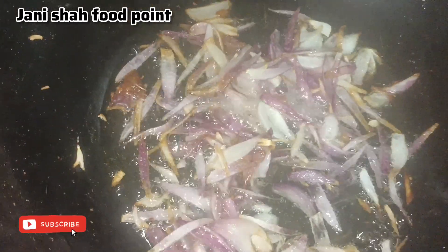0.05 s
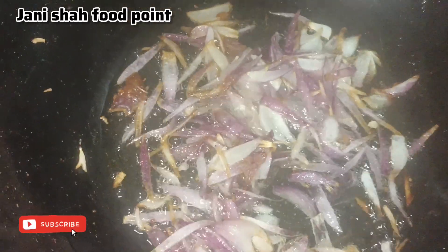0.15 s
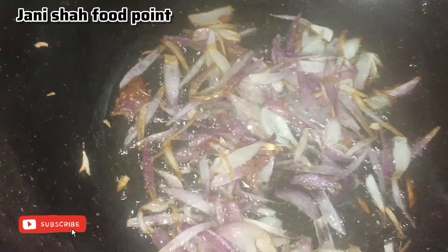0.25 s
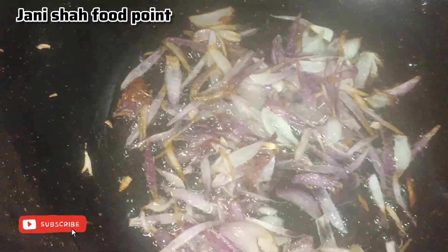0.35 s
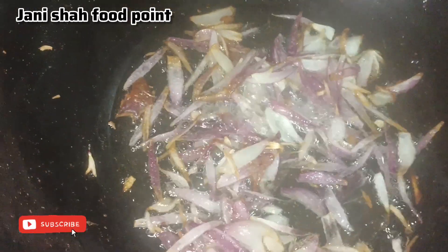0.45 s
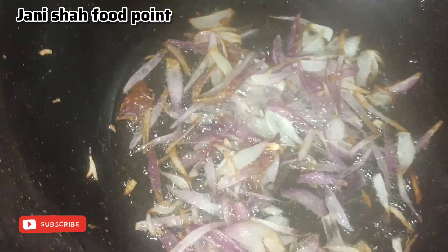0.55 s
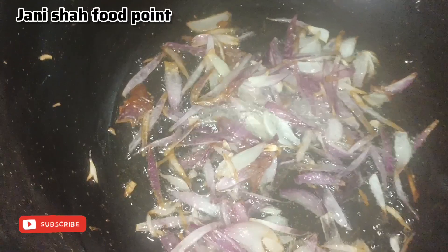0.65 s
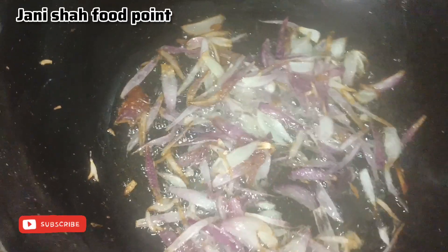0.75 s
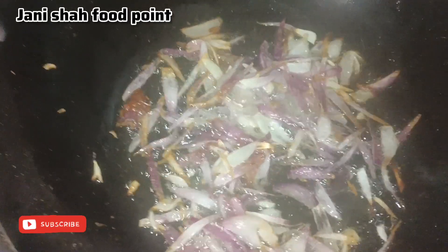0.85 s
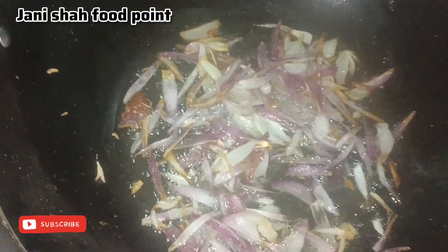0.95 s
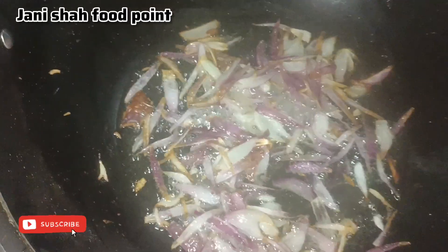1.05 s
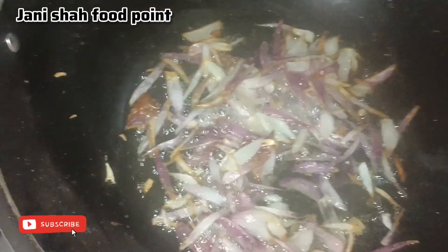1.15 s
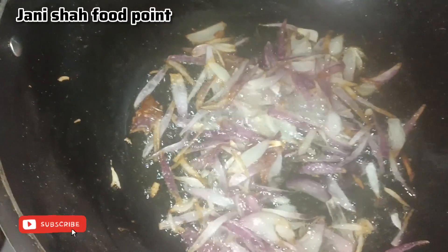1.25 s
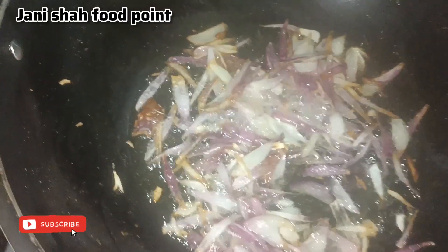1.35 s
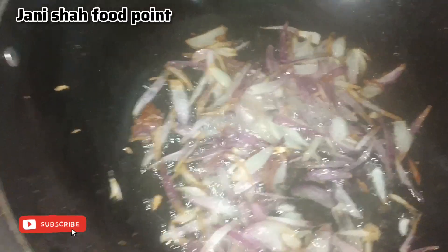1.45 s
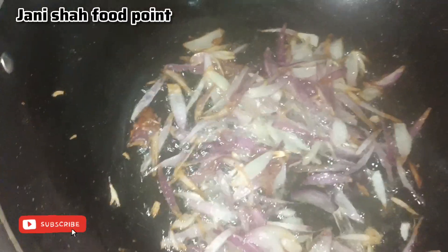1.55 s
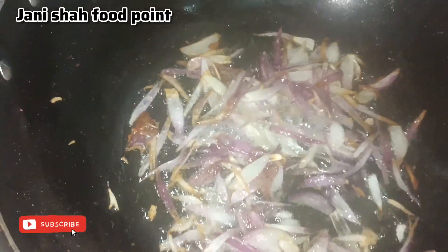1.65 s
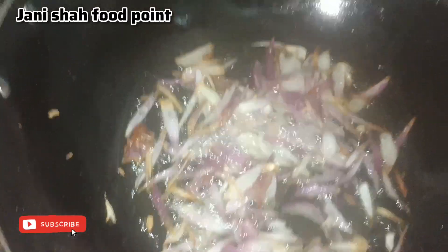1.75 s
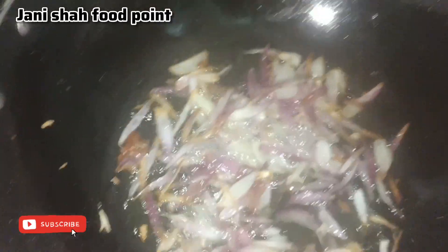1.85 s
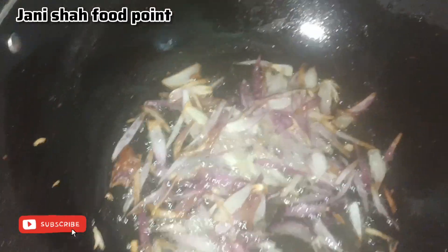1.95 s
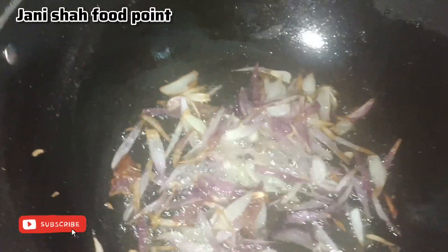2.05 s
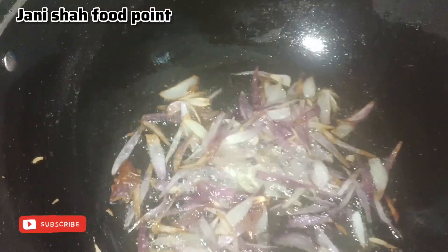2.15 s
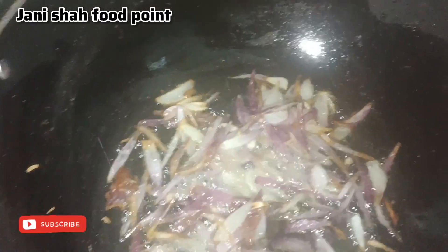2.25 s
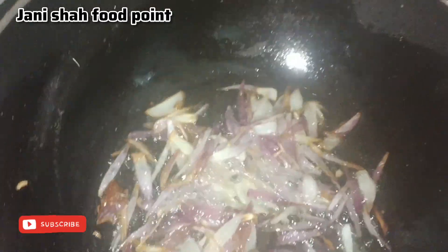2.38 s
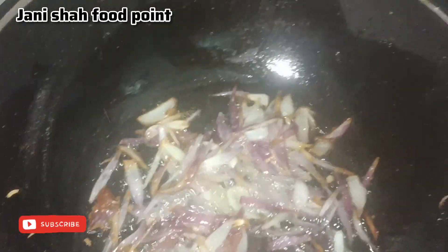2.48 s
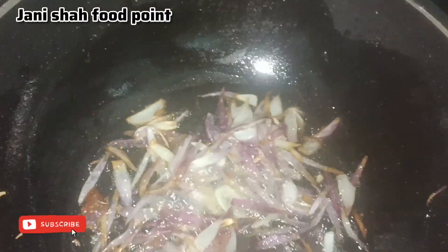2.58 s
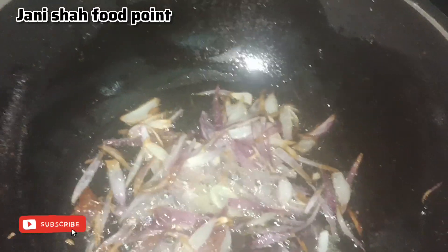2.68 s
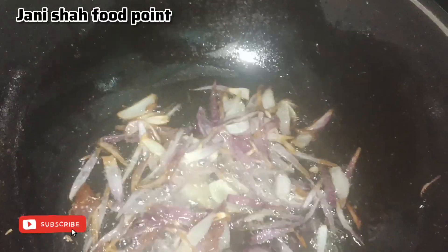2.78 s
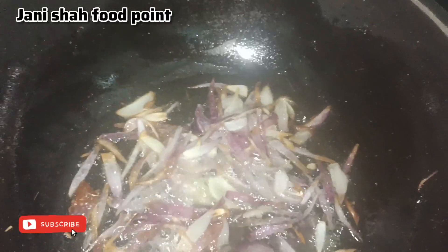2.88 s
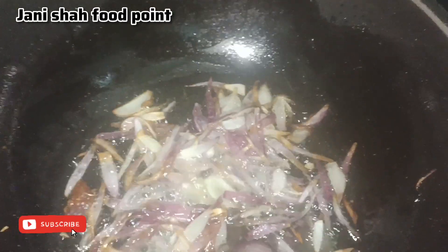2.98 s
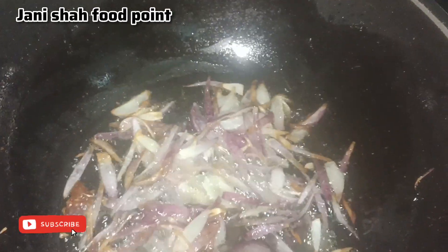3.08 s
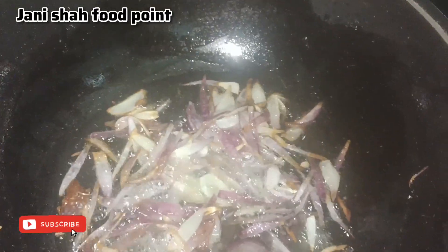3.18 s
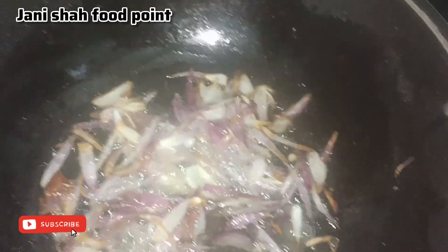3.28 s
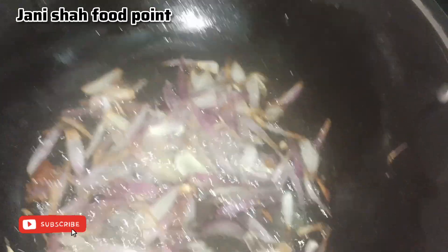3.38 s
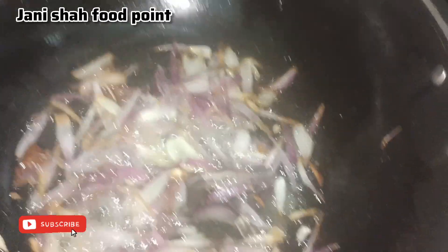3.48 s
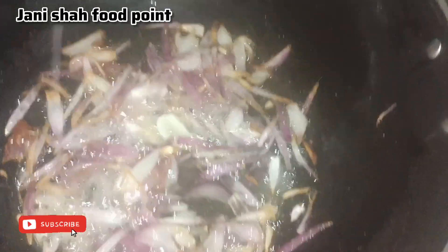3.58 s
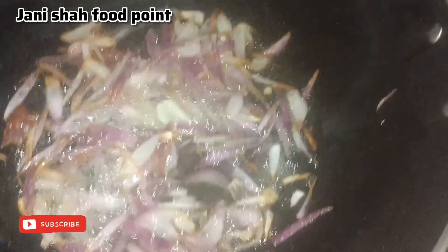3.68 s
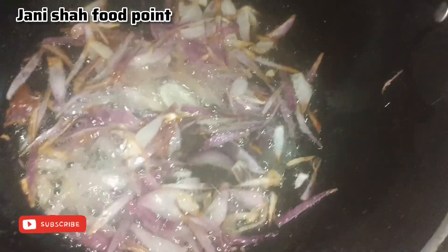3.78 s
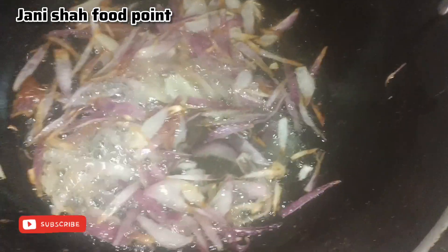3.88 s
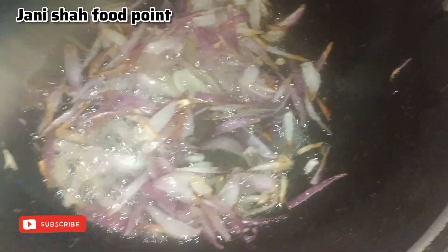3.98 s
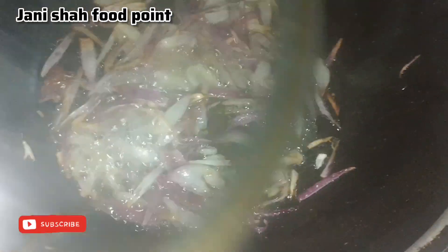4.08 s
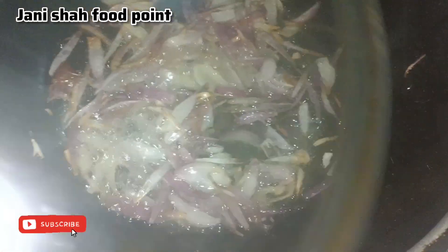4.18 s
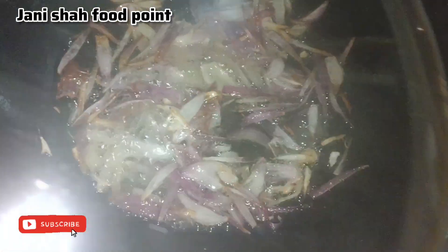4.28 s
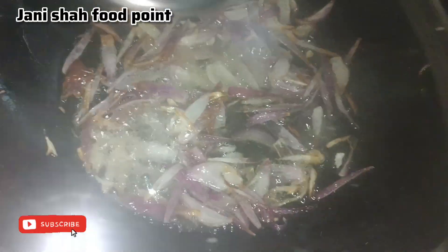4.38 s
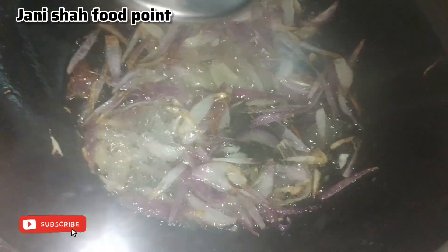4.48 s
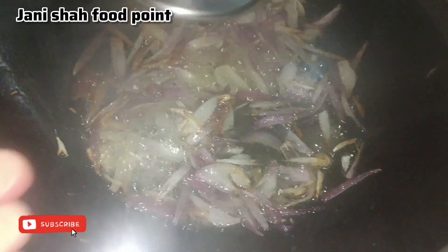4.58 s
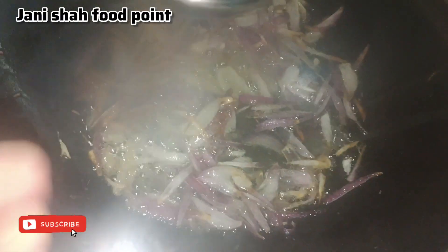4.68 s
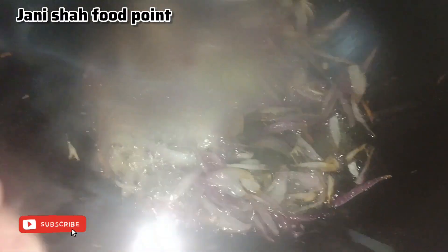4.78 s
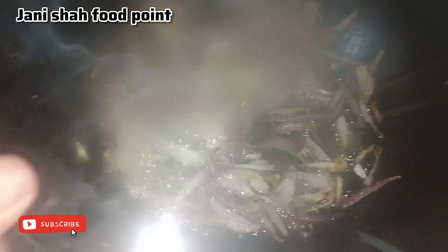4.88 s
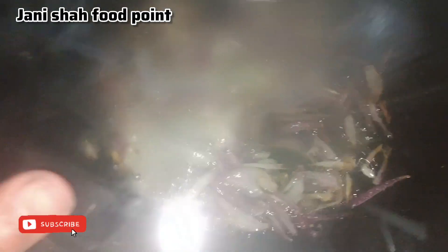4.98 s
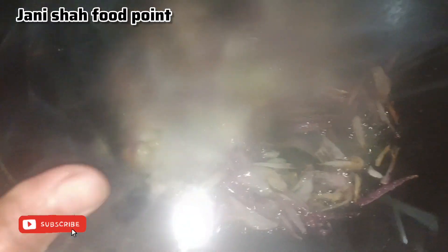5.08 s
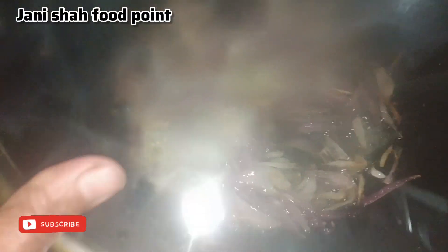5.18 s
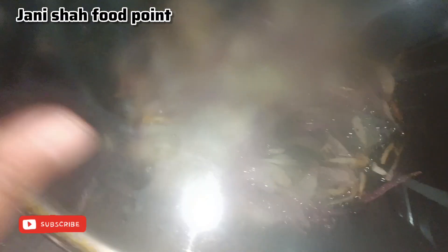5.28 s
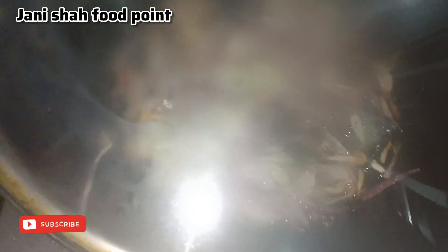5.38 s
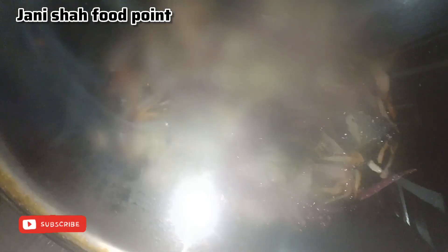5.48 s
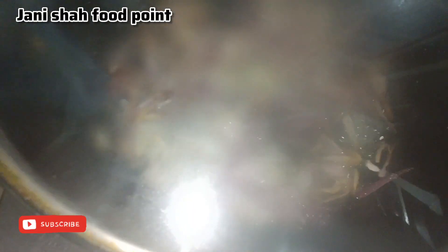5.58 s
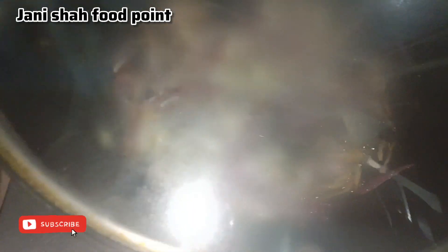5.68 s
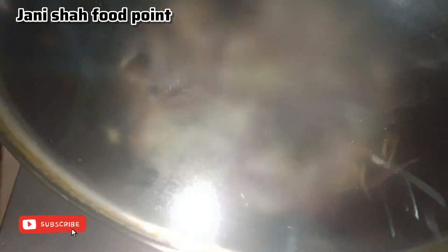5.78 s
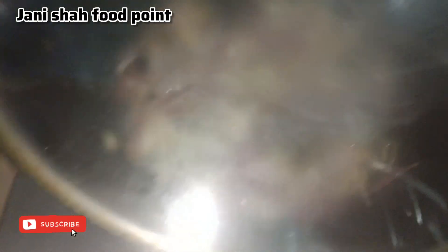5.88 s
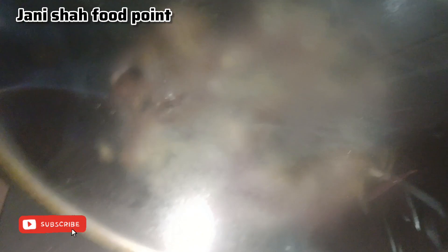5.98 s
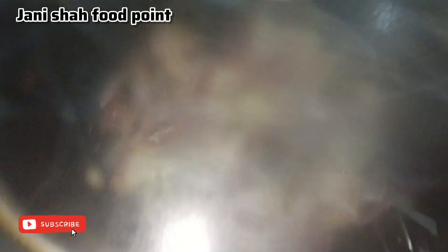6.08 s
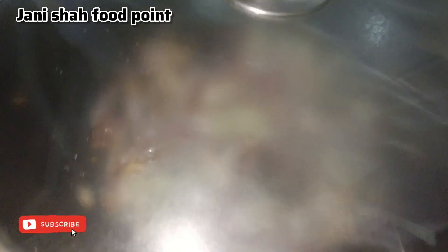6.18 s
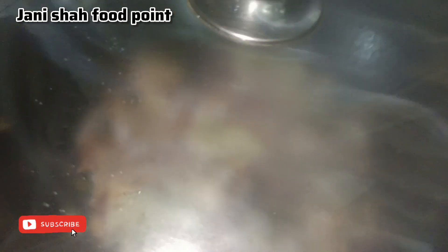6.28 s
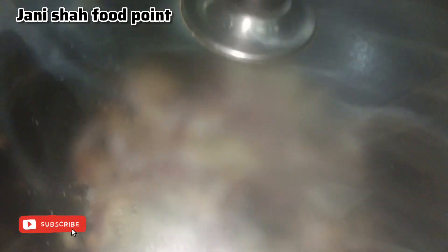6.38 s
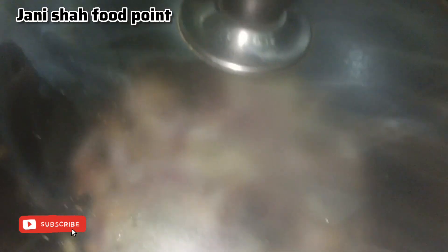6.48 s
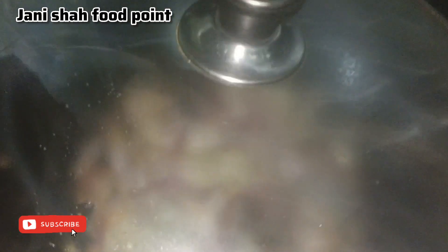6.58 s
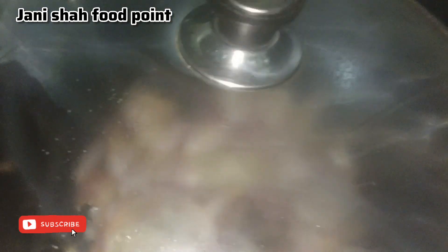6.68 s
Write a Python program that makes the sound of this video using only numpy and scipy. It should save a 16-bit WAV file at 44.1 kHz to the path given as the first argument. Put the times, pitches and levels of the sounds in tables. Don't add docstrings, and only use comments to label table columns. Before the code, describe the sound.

Close handheld capture of a wok: a soft distant sizzle, then a bright rush as the microphone leans in, with dense bubbling, round plops and sharp fat snaps in irregular flurries. A couple of light low knocks come midway. The glass lid then clanks, drags and lands in several hard hits, cutting the low wash and spatter. Muffled simmering with small whistly surges remains. The sound sits on the left, with faint handling thumps on the right.

```python
import sys
import numpy as np
from scipy import signal
from scipy.io import wavfile
from scipy.ndimage import uniform_filter1d

SR = 44100
rng = np.random.default_rng(int(sys.argv[2]) if len(sys.argv) > 2 else 0)


def wav_out(sig):
    wavfile.write(sys.argv[1], SR, np.round(np.clip(np.atleast_2d(sig).T, -1, 1) * 32767).astype(np.int16))


def field_ratio(decibels):
    return 10 ** (np.asarray(decibels, dtype=float) / 20)


N = 297234
T = np.arange(N) / SR
HZ = abs(np.fft.fftfreq(8192, 1 / SR))

# freq_hz, density_db (per Hz)
FAR_COLOUR = [(180, -67.5), (300, -16.5), (742, -7.5), (1060, -0.5), (1360, 0.5), (1660, 1.5), (2360, -4),
              (3770, -4.5), (5020, -9.5), (9980, -10), (11000, -10.5), (11700, -27), (15200, -14.5),
              (16500, -45)]
# freq_hz, density_db (per Hz)
OPEN_COLOUR = [(180, -19), (300, -23), (531, -16.5), (742, -20), (1060, -4), (1310, 9.5), (1450, 10),
               (1800, 5.5), (2610, 6), (3650, 4.5), (5930, -19), (8900, -13), (9900, -9.5), (11000, -13),
               (11700, -21.5), (14900, -18.5), (16500, -37.5)]
# start_s, peak_db, pitch_hz
FAR_POPS = [(0.0832, -27, 1780), (0.1135, -27, 1070), (0.1535, -23, 1590), (0.2025, -20, 1080),
            (.44, -18, 3900), (.6619, -20, 3760), (.818, -25, 3500), (1.058, -28, 1640),
            (0.3728, -20, 2500), (0.5647, -16, 1080), (0.7618, -20, 1080), (0.8497, -18, 2030),
            (0.8998, -19.5, 2440), (0.9772, -21, 1520), (1.1069, -14, 2420), (1.2077, -20, 2000),
            (1.277, -16, 1710), (1.4426, -23, 2770)]
# start_s, peak_db, pitch_hz
LARGE_POPS = [(0.341, -15, 1600), (0.557, -16, 1100), (1.1357, -7, 2340), (1.125, -20.5, 1016),
              (1.3204, -21, 2560), (1.841, -11.5, 2630), (2.2172, -15, 2580), (2.4886, -15, 2620),
              (2.002, -15, 1100), (2.349, -17, 1250), (2.78, -24, 1220), (2.892, -19, 1320),
              (1.3371, -11.5, 2100), (1.3792, -19, 1390), (1.492, -4.5, 2630), (1.608, -9, 2050),
              (1.694, -8.5, 2600), (1.8628, -7, 1640), (2.0685, -9, 3180), (2.231, -9, 1320),
              (2.5007, -8, 1490), (2.6243, -10, 1970), (2.8438, -14, 1720), (3.0055, -14, 2630),
              (3.145, -12, 1510), (3.2256, -6.5, 2460), (3.3309, -2.5, 2250), (3.419, -15, 2630),
              (3.513, -10.5, 1440), (3.554, -7.5, 1530), (3.6048, -7.5, 2860), (3.666, -8, 2590),
              (3.7837, -5, 1565), (3.8959, -8, 2930), (4.0853, -10, 3400), (4.1628, -8, 2030),
              (4.1935, -3.5, 1470), (4.321, -7, 2490), (4.612, -19, 1470)]
# start_s, peak_db, pitch_hz
MIDDLING_POPS = [(1.1568, -30, 1270), (1.195, -35, 1360), (1.232, -22, 2100), (1.4133, -22.5, 1070),
                 (1.468, -13.5, 2640), (1.5318, -24, 2900), (1.5568, -18, 1400), (1.63, -11.5, 2260),
                 (1.6572, -12, 2670), (1.7265, -21, 2050), (1.7644, -21, 2100), (1.9638, -13.5, 2640),
                 (2.0246, -24, 2000), (2.095, -20, 2440), (2.1891, -16, 1420), (2.2092, -16, 1610),
                 (2.2513, -13.5, 1300), (2.3191, -31, 3190), (2.333, -20, 2750), (2.4071, -20, 1150),
                 (2.4433, -11, 2500), (2.5998, -16, 2500), (2.6514, -20, 2210), (2.7352, -12.5, 1640),
                 (2.7648, -18, 1580), (2.8085, -15, 1660), (2.8753, -17, 2500), (2.9138, -12.5, 1520),
                 (2.9638, -15, 2090), (2.9876, -26, 2280), (3.0316, -13, 3720), (3.055, -17, 2840),
                 (3.1228, -16, 2410), (3.1841, -29, 2503), (3.2413, -17, 2260), (3.265, -19, 2750),
                 (3.2841, -21, 2690), (3.3064, -20, 2030), (3.3168, -14, 2520), (3.3577, -14, 3570),
                 (3.3937, -23, 2210), (3.4296, -12, 2680), (3.459, -14, 2980), (3.4805, -19, 2470),
                 (3.5281, -9.5, 2170), (3.5716, -8.5, 2560), (3.6195, -22, 1540), (3.645, -16.5, 1560),
                 (3.6958, -17, 2440), (3.7077, -13, 1980), (3.7236, -8.5, 2630), (3.8043, -10, 2500),
                 (3.8187, -12.5, 1560), (3.8538, -13, 3320), (3.928, -13.5, 1970), (3.9798, -23, 1533)]
# start_s, peak_db, pitch_hz
LATE_POPS = [(3.96, -14, 1460), (4.0035, -8.5, 1470), (4.1285, -11, 2500), (4.252, -9.5, 2500),
             (4.299, -19, 2480), (4.348, -10, 2310), (4.3885, -20, 2500), (4.4192, -16, 1480),
             (4.4658, -12.5, 2430), (4.5393, -11.5, 1980), (4.5807, -9, 2400), (4.6088, -7.5, 2520),
             (4.6383, -10, 1950), (4.679, -15, 1660), (4.701, -9.5, 1510), (4.764, -18.5, 1400),
             (4.791, -17, 1830), (4.8587, -17, 1370), (5.0545, -9.5, 1397), (5.0825, -13.5, 1090),
             (5.182, -13, 2050)]
# start_s, peak_db, pitch_hz, t60_s
SURGES = [(4.613, -20.5, 1435, 0.0795), (4.858, -24.5, 1410, 0.049), (4.92, -45, 1377, 0.12),
          (4.952, -24.5, 3560, 0.075), (5.038, -20, 1935, .06), (5.05, -19, 1412, 0.07),
          (5.614, -37.5, 1394, 0.14), (6.1, -42, 1381, 0.18), (6.164, -32.5, 1370, 0.12),
          (5.333, -21, 2770, 0.025), (5.4228, -30, 2100, 0.049), (5.456, -27, 2100, 0.049),
          (5.5794, -28, 3284, 0.12), (5.6162, -37, 2410, 0.032), (5.68, -26.5, 2070, 0.048),
          (5.7994, -24.5, 2010, 0.031), (5.8174, -30, 2180, 0.088), (5.8628, -28.5, 2410, 0.035),
          (6.022, -34, 2410, 0.047), (6.1, -43, 2150, 0.06), (6.1697, -39, 1940, 0.11),
          (6.2, -26, 2730, 0.042), (6.213, -26, 2357, 0.089), (6.305, -30.5, 2086, 0.15),
          (6.354, -23, 2050, 0.032), (6.4207, -20.5, 2075, 0.064), (6.6243, -32, 2460, 0.095),
          (6.669, -29, 2470, 0.04), (5.491, -38, 2040, .04), (5.653, -37, 2370, .03),
          (5.768, -38, 2400, .04), (5.81, -27.5, 2260, .04), (5.967, -35, 2080, .04),
          (5.982, -33, 3300, .03), (6.118, -35.5, 2010, 0.035), (6.208, -34, 2040, 0.036),
          (6.515, -32, 2070, 0.036), (6.552, -36, 2830, .05), (5.3, -37.5, 1380, 0.11),
          (5.378, -39, 1377, 0.12), (5.708, -45, 1373, 0.085), (6.345, -37, 1380, 0.1),
          (6.42, -36, 1383, 0.088), (6.618, -36.5, 1372, 0.11)]
# start_s, peak_db, top_octave_db (re peak)
SHARP_SPITS = [(0.304, -19, -24), (0.3928, -19, -14), (1.088, -20, -20), (1.1074, -20, -24),
               (1.2373, -16, -24), (1.323, -16, -20), (1.379, -14, -15), (1.412, -23, -36),
               (1.514, -21, -25), (1.628, -14.5, -31), (1.75, -15, -18), (1.825, -9.5, -37),
               (2.146, -20, -15), (2.1635, -13.5, -10), (2.379, -18, 2), (2.3983, -24, -14),
               (2.4264, -16, -15), (2.465, -26, 1), (2.647, -19, -13), (2.726, -10.5, -24),
               (2.8813, -17, -7), (2.928, -19, 2), (3.01, -18, -13), (3.2006, -20, -41),
               (3.422, -11.5, -22), (3.57, -14, -35), (3.8252, -14, -6), (4.01, -10, -5), (4.108, -21, -25),
               (4.1767, -11.5, -15)]

LEAN_IN_S = (0.84, 1.16)
LID_LOWERED_S, LID_SHUT_S, SETTLED_S = (4.3, 4.8), (4.8, 5.15), 5.164


def evened(x):
    return x / np.sqrt(np.mean(x ** 2) + 1e-20)


def add(mix, s, sound):
    part = mix[round(s * SR):][:len(sound)]
    part += sound[:len(part)]


def curves(rows):
    s, *columns = np.transpose(rows)
    return [np.interp(T, s, c) for c in columns]


def ramp(span):
    return np.interp(T, span, (0, 1))


def swell(times):
    return ramp(times[:2]) - ramp(times[2:])


def read(points):
    f, db = np.transpose(points)
    return np.interp(np.log(HZ + 1), np.log(f), db)


def peaks(modes):
    return sum(field_ratio(db) ** 2 / (1 + (2 * (HZ - hz) / width) ** 2) for hz, width, db in modes)


def coloured(x, db, lo_hz, hi_hz):
    band = 1 / (1 + (lo_hz / (HZ + 1)) ** 16) / (1 + (HZ / hi_hz) ** 16)
    log_gain = np.log(field_ratio(db) * np.sqrt(band) + 1e-7)
    taps = np.fft.ifft(np.exp(np.conj(signal.hilbert(log_gain)))).real[:3000]
    led_in = np.r_[x[-len(taps):], x]
    return signal.oaconvolve(led_in, taps / np.linalg.norm(taps))[len(taps):][:N]


def narrow(hz, width):
    return evened(coloured(rng.standard_normal(N), 20 * np.log10(peaks([(hz, width, 0)])), 92, 3000))


def slow(rate):
    low = signal.butter(1, rate, fs=SR, output="sos")
    return evened(signal.sosfiltfilt(low, rng.standard_normal(N + 2 * SR))[SR:-SR])


def clicks(rate, spread_db):
    sizes = field_ratio(spread_db * np.minimum(rng.exponential(1, N), 5))
    return sizes * (rng.random(N) < rate / SR)


def ring(hz, t60, glide=.0, rise=1.95):
    t = T[:round(t60 * SR) + 50]
    wave = np.sin(2 * np.pi * hz * t * (1 + glide * t / t60))
    return field_ratio(-60 * t / t60) * wave * (1 - np.exp(-t * hz * rise))


def bubbles(rate, spread_db, cycles, count=16):
    train, size = clicks(rate, spread_db), rng.integers(0, count, N)
    total = np.zeros(N)
    for k, hz in enumerate(np.linspace(500, 5600, count)):
        tone = ring(hz, cycles / hz, 0.16)
        total += signal.oaconvolve(train * (size == k), tone / np.linalg.norm(tone))[:N]
    return evened(total)


def bowl(x):
    tail = 0.03 * field_ratio(-60 * T[:1200] / 0.035) * rng.standard_normal(1200)
    return x + signal.oaconvolve(x, tail)[:N]


def controls():
    # start_s, bubbling_db
    boil = [(0.0, -40.5), (0.37, -41.5), (1.01, -41.5), (1.26, -36), (1.91, -32), (2.44, -34), (3.73, -32),
            (4.39, -33.5), (4.69, -32), (4.94, -38.5), (5.07, -33.5), (5.16, -34), (5.35, -41), (6.2, -42),
            (6.72, -42.5)]
    level_db, = curves(boil)
    over_quiet_db = level_db + 40
    lid_ajar, lid_before = 0.088, 0.1
    lid = lid_ajar * ramp(LID_LOWERED_S) + (1 - lid_ajar) * ramp(LID_SHUT_S)
    far = 0.92 * (1 - ramp(LEAN_IN_S))
    low_db = -1.5 + (0.72 - 1) * over_quiet_db
    low_db = low_db - 9.5 * ramp((4.0, 5.0)) - 16 * ramp((5.12, 5.33))
    steam_db = 0.65 + (0.53 * (1 - lid) - 1) * over_quiet_db
    steam_db = steam_db + 2.5 * swell((1.1, 1.22, 1.5, 1.9))
    steam_db = steam_db - 2 * ramp((2.9, 4.3))
    steam_db = steam_db - 6.5 * swell((4.42, 4.65, 4.75, 5.2)) - 1.5 * lid
    return level_db, low_db, steam_db, *np.clip([far, np.maximum(lid, lid_before)], 0, 1)


def lid_db():
    # freq_hz, density_db (per Hz)
    shut_colour = [(180, -58), (300, -31.5), (1210, -61.5), (1380, 29), (1500, -7), (2060, 7.5),
                   (2570, -16), (2790, -47), (4460, 10.5), (6140, -30), (9980, 0.5), (11800, -11.5),
                   (15200, -9), (16500, -47)]
    # freq_hz, width_hz, level_db
    cavity = [(1370, 58, 3.5), (1590, 47, 3.5), (1856, 124, 4), (2041, 26, 10), (2260, 90, 4.5),
              (2410, 37, 8.5), (2770, 72, 6.5), (3180, 54, 3.5), (3556, 240, 0), (4050, 124, -0.5),
              (4330, 200, -32), (4880, 42, -4), (5480, 100, -9.5)]
    power = field_ratio(read(shut_colour)) ** 2 + field_ratio(14.5) ** 2 * peaks(cavity)
    return 10 * np.log10(power / (1 + (1300 / (HZ + 1)) ** 30) + 1e-9)


def stirred():
    stir = np.zeros(N)
    for s, *_ in [*FAR_POPS, *LARGE_POPS, *MIDDLING_POPS, *LATE_POPS, *SURGES]:
        decay_s = .018 * (1 + (s > SETTLED_S))
        add(stir, s, np.exp(-T[:4000] / decay_s))
    stir = np.sqrt(abs(uniform_filter1d(stir, size=80)) * (1 - .4 * ramp(LID_SHUT_S)))
    return evened(stir - uniform_filter1d(stir, size=SR // 3))


def sizzle():
    level_db, low_db, steam_db, far, shut = controls()
    through_lid = lid_db()
    views = [(far, read(FAR_COLOUR)),
             (np.maximum(1 - far - shut, 0), read(OPEN_COLOUR)),
             (shut, np.where(HZ > 1150, through_lid, through_lid.max() - 48.0))]
    crackle = evened(bowl(clicks(1400, 3.3) * rng.choice([-1., 1.], N)))
    steam = rng.standard_normal(N)
    flurry = evened(.8 * slow(45) + .4 * slow(5) + .8 * stirred())
    flurry = flurry * (.8 + .15 * shut - .4 * far)
    grain = 1 - 0.71 * shut
    grains = .35 * bubbles(900, 2.5, 24) + .7 * bubbles(1900, 2.9, 7) + .15 * crackle
    froth = evened(grain * grains + np.sqrt(.88 - .64 * grain ** 2) * steam)
    wash = evened(froth + 2.24 * steam)
    fizz = evened(0.68 * crackle + 0.56 * steam)
    fizz_db = steam_db - 6.0 + 1.5 * flurry + 1.6 * slow(50)
    bands = [(wash, low_db + 0.5 + 3.5 * (1 - shut) * flurry, 250, 1200),
             (froth, 1.43 + 2.21 * flurry, 1200, 5600),
             (fizz, fizz_db, 5600, 17000)]
    out = np.zeros(N)
    for drive, db, lo, hi in bands:
        for share, colour in views:
            if lo <= 500:
                colour = np.minimum(colour, read(FAR_COLOUR))
            out += field_ratio(level_db + db) * np.sqrt(share) * coloured(drive, colour, lo, hi)
    return out


def scrape():
    # start_s, length_s, level_db, fade_db (over the stroke)
    strokes = [
        (0, 0.34, -48, -13),
        (2.604, 0.49, -50, -6.5),
        (4.415, 0.2, -36.5, -4.5),
        (4.637, 0.37, -31, -21),
        (5.012, 0.065, -38.5, -3.5),
        (5.09, 0.23, -42.5, -19.5),
    ]
    # freq_hz, width_hz, level_db
    rim = [(121.5, 70, -27), (240, 90, -12.5), (291.5, 59, 13), (516, 105, 1), (895, 14, 7),
           (1080, 120, -24)]
    slips = evened(clicks(900, 4.34) + 0.43 * rng.standard_normal(N))
    push = np.zeros(N)
    for s, length, db, fade_db in strokes:
        level = field_ratio(db + fade_db * np.clip((T - s) / length, 0, 1))
        push += level * (T >= s) * (T < s + length)
    push = uniform_filter1d(push, size=200, origin=99)
    return field_ratio(6.5) * push * coloured(slips, 10 * np.log10(peaks(rim)), 104, 1300)


def hum():
    # start_s, end_s, pitch_hz, level_db
    hums = [
        (0.018, 0.34, 95, -54),
        (0.41, 0.584, 92, -56),
        (0.614, 0.997, 92, -56.5),
        (2.953, 3.177, 65, -56.5),
        (3.472, 3.606, 65.5, -56),
        (3.693, 3.99, 68.6, -57),
        (4.23, 4.393, 62, -55),
        (6.624, 6.798, 93, -52),
    ]
    out = field_ratio(-73.0) * coloured(rng.standard_normal(N), 0.38 * np.log2(HZ + 30), 36.5, 303)
    in_phase, quadrature = evened(slow(14) + .6), .75 * slow(14)
    for start, end, hz, db in hums:
        gate = uniform_filter1d(1. * (T > start) * (T < end), 900)
        turn = 2 * np.pi * hz * T
        out = out + field_ratio(db) * gate * (in_phase * np.cos(turn) + quadrature * np.sin(turn))
    return signal.sosfilt(signal.butter(2, 48, "high", fs=SR, output="sos"), out)


def scattered(gap_s, until_s, listed):
    bunching = 5
    draw = rng.random((int(until_s / gap_s) - bunching, 3))
    s = (np.arange(len(draw)) + bunching * draw[:, 0]) * gap_s
    free = abs(s[:, None] - np.array(listed)[:, 0]).min(1) > .012
    return s[free], draw[free, 1], draw[free, 2]


def chance_pops():
    near_hz, far_hz = (1470, 2050, 2500, 2600, 3460), (1070, 1640, 3730, 2500, 1970)
    level_db, _, _, far, _ = controls()
    listed = [*FAR_POPS, *LARGE_POPS, *LATE_POPS, *MIDDLING_POPS]
    s, strength, size = scattered(.03, LID_LOWERED_S[0], listed)
    kind, fine = np.divmod(size * len(near_hz), 1)
    kind = kind.astype(int)
    hz = np.where(s < LEAN_IN_S[0], np.take(far_hz, kind), np.take(near_hz, kind))
    hz = hz * (1 + 0.22 * (fine - .5))
    db = np.interp(s, T, level_db + 0.5 * far) + 8.5 + 12 * (strength - .5)
    cycles = np.interp(20 * fine % 1, (0, 1), (9, 30))
    return np.transpose([s, db, hz, cycles])


def pops():
    large = [(*row, 32) for row in [*FAR_POPS, *LARGE_POPS, *LATE_POPS]]
    middling = [(s, db + 3.5, hz, 14) for s, db, hz in MIDDLING_POPS]
    out = np.zeros(N)
    for s, db, hz, cycles in [*large, *middling, *chance_pops()]:
        pop = ring(hz, cycles / hz, .03, rise=2.2)
        add(out, s, field_ratio(db - 2) * pop / abs(pop).max())
        add(out, s, field_ratio(db - 4) * ring(hz * 1.05, 0.002, rise=3))
    return signal.sosfilt(signal.butter(2, (600, 3900), "band", fs=SR, output="sos"), out)


def small_spits():
    level_db, _, steam_db, _, shut = controls()
    starts, strength, size = scattered(.016, T[-1], SHARP_SPITS)
    levels = np.interp(starts, T, level_db + steam_db - 7 * shut)
    levels = levels + 17.5 + 9 * (strength ** 2 - .5)
    out = np.zeros(N)
    for s, db, hz in zip(starts, levels, np.interp(size, (0, 1), (7500, 15500))):
        add(out, s, field_ratio(db) * ring(hz, 12 / hz, rise=2.3))
    return out


def snaps():
    # start_s, peak_db
    tick_list = [(0.2044, -27), (0.2843, -24), (0.5202, -29), (0.606, -29), (0.6464, -29), (0.7248, -38),
                 (0.85, -36), (0.9802, -36), (1.0455, -29), (1.0675, -27), (1.294, -37), (1.3414, -26),
                 (1.4431, -34), (1.4745, -32), (1.7823, -30), (1.8038, -31), (1.8552, -28), (2.0727, -23),
                 (2.1221, -27), (2.2258, -30), (2.2922, -22), (2.5745, -24), (2.603, -24), (2.8399, -24),
                 (2.9522, -28), (3.1233, -28), (3.6137, -35), (4.1435, -25), (4.153, -22), (1.435, -31),
                 (2.738, -26), (2.455, -28)]
    # start_s, peak_db
    crack_list = [
        (4.387, -29),
        (4.419, -22),
        (4.615, -27),
        (4.623, -24),
        (4.6385, -22),
        (4.7002, -15),
        (4.802, -17),
        (5.031, -21),
        (5.0825, -19),
        (5.104, -18),
    ]
    # start_s, peak_db
    snap_list = [
        (0.0838, -24),
        (.1145, -21),
        (.3395, -20),
        (1.379, -14.5),
        (1.444, -17),
        (1.537, -21),
        (4.063, -23),
        (4.177, -22),
    ]
    spits, tops, ticks, cracks = np.zeros((4, N))
    for s, db, top_db in SHARP_SPITS:
        add(spits, s, field_ratio([db + 5.5]))
        add(tops, s, field_ratio([db + top_db + 14.0]))
    for s, db in tick_list:
        add(ticks, s, field_ratio([db + 11.5]))
    for s, db in crack_list + snap_list:
        add(cracks, s, field_ratio([db + 13.5]))
    out = coloured(ticks, 0 * HZ, 9000, 19000) + coloured(cracks, read(FAR_COLOUR), 460, 5200)
    out = out + coloured(spits, read(OPEN_COLOUR), 7000, 15500)
    return out + coloured(tops, read(OPEN_COLOUR), 16200, 26000)


def covered(left):
    # start_s, peak_db, t60_s
    grip = [(.09, -50, 0.12), (.84, -59, 0.14), (1.329, -50, 0.15), (1.4, -55, 0.27), (1.725, -45, 0.054),
            (1.744, -51, 0.046), (1.78, -51, .1), (1.805, -49, 0.05), (5.88, -49, 0.12), (6.24, -51, 0.071),
            (6.52, -68, .05)]
    # freq_hz, density_db (per Hz)
    port_colour = [(40, -104), (150, -112), (400, -124), (1500, -128), (5000, -136), (16000, -140)]
    push = sum(field_ratio(db - 60 * np.maximum(T - s, 0) / t60) * (T > s) for s, db, t60 in grip)
    thud = coloured(push * rng.standard_normal(N), -12 * np.log2(1 + (HZ / 300) ** 2), 44, 15000)
    own = field_ratio(-85.0) * coloured(rng.standard_normal(N), read(port_colour) + 100, 30, 18000)
    out = thud + own + field_ratio(-86.5) * coloured(left, 0 * HZ, 1160, 2114)
    tap_s, tap_db = 1.8225, -3
    add(out, tap_s, -field_ratio(tap_db - 0.5) * ring(530, 0.0045))
    add(out, tap_s + 0.0036, field_ratio(tap_db) * ring(210, 0.008))
    return out


def knocks():
    # start_s, peak_db, pitch_hz, t60_s, clink_db (re peak)
    strikes = [(0.156, -30, 700, 0.18, 7), (2.626, -25.5, 288, 0.32, -5), (2.663, -24, 246, 0.07, -13),
               (2.7, -32.5, 283, 0.35, -8), (2.822, -22.5, 267, 0.12, -3), (4.418, -22, 218, 0.15, 0),
               (4.468, -25.5, 354, 0.17, -19), (4.516, -24.5, 342, 0.25, -11),
               (4.639, -14.5, 240, 0.14, -19), (4.698, -21.5, 405.4, 0.23, -1), (4.735, -21, 314, 0.13, 2),
               (4.907, -27.5, 359, 0.17, -3), (5.014, -24, 318, 0.13, -6), (5.083, -11.5, 320, 0.12, -5),
               (5.105, -13.5, 346, 0.072, 1), (4.858, -32.5, 326, 0.085, -5), (5.205, -38, 253, 0.14, -12),
               (5.403, -47, 228, 0.11, -2)]
    out = np.zeros(N)
    for s, db, hz, t60, clink_db in strikes:
        add(out, s, field_ratio(db) * ring(hz, t60, -0.072))
        add(out, s, field_ratio(db - 11.5) * ring(hz * 1.7, 0.74 * t60))
        add(out, s, field_ratio(db - 9.5) * ring(hz * .42, 0.29 * t60))
        add(out, s, field_ratio(db - 11.0) * ring(870, .008, rise=2.5))
        for clink_hz in (740, 930, 1110):
            add(out, s, field_ratio(db + clink_db - 14.0) * ring(clink_hz, 0.11))
    return out


def hushed(pop_db, lift_db=-8):
    hush_s = .011
    dip_db, shape = np.zeros(N), np.sin(np.pi * T[:round(hush_s * SR)] / hush_s) ** .5
    for s, *_ in [*LARGE_POPS, *LATE_POPS]:
        add(dip_db, s - hush_s, pop_db * shape)
    for s in (4.4185, 4.638, 5.082):
        add(dip_db, s - hush_s, lift_db * shape)
    return field_ratio(dip_db)


def bumps():
    # start_s, peak_db, pitch_hz, t60_s
    thumps = [(0.55, -39, 310, 0.19), (0.57, -45, 260, .15), (2.3, -49.5, 250, 0.34), (1.5, -44, 260, 0.23),
              (2.8, -48, 240, 0.17), (2.63, -24, 113, 0.12), (2.695, -28, 125, 0.22),
              (2.72, -35, 128, 0.22), (2.868, -36, 126, 0.19), (2.66, -45, 62, 0.24),
              (4.53, -38, 75.7, 0.15), (4.642, -25, 510, .08), (4.7, -23, 600, 0.07),
              (4.42, -25, 460, 0.11)]
    out = np.zeros(N)
    for s, db, hz, t60 in thumps:
        add(out, s, field_ratio(db) * ring(hz, t60, rise=1.0))
    return out


def swept(x):
    # start_s, extra_path_ms
    wall_path = [(.84, .3), (.93, .25), (1.03, .195), (1.1, .16), (1.16, .13), (1.36, .12), (1.7, .1)]
    (ms,), strength = curves(wall_path), .72 * swell((.86, .95, 1.4, 1.75))
    late = np.interp(T - ms / 1000, T, uniform_filter1d(x, size=3))
    return (x + strength * late) / np.sqrt(1 + strength ** 2)


def surges():
    out = np.zeros(N)
    for s, db, hz, t60 in SURGES:
        puff = ring(hz, t60, rise=2.6)
        rough = uniform_filter1d(rng.standard_normal(9000), size=9)[:len(puff)]
        hiss = uniform_filter1d(rng.standard_normal(9000), size=8)[:len(puff)]
        add(out, s, field_ratio(db) * puff * (0.48 + rough * 1.97))
        add(out, s, 0.36 * field_ratio(db - 45 * T[:len(puff)] / t60) * hiss)
    return 0.69 * coloured(out, lid_db(), 590, 4000)


def lid_air():
    # freq_hz, width_hz, level_db, t60_s, end_s
    settling = [
        (267, 56, -34, 0.6, 5.47),
        (824, 71, -52.5, 2.1, 5.37),
        (600, 180, -59, 0.56, 5.31),
        (858, 40, -82, 50, 7),
    ]
    level_db, *_ = controls()
    rest = np.zeros(N)
    for hz, width, db, t60, end in settling:
        decay = field_ratio(db - 60 * np.maximum(T - SETTLED_S, 0) / t60)
        rest += decay * swell((SETTLED_S, SETTLED_S + 0.01, end - .08, end)) * narrow(hz, width)
    return rest + field_ratio(level_db - 9) * ramp(LID_SHUT_S) * narrow(1380, 45)


def scene():
    rim = signal.sosfilt(signal.butter(3, 90, "high", fs=SR, output="sos"), scrape() + knocks())
    contacts = hushed(0) * (rim + bumps())
    bursts = bowl(pops() + small_spits() + snaps()) + surges()
    left = 2 * (hushed(-2.5) * swept(sizzle()) + contacts + bursts + lid_air() + hum())
    return np.array([left, covered(left)])


def band_limit(x):
    return signal.sosfilt(signal.butter(12, 16820, fs=SR, output="sos"), x)


def record(dry):
    power_db = 10 * np.log10(abs(uniform_filter1d(dry[0] ** 2, 100)) + 1e-12)
    fall = T * 260.0
    held_db = np.maximum.accumulate(power_db + fall) - fall
    over_db = np.maximum(held_db + 18.5, 0)
    late_db = uniform_filter1d(over_db, size=120, origin=59)
    ducked = dry / field_ratio(0.4 * late_db)
    edge = signal.firwin(511, 15800, window=("kaiser", 6), fs=SR)
    mix = 0.67 * signal.oaconvolve(ducked, edge[None], "same") + 0.0017 * ducked
    return band_limit(mix)


dry = scene()
out = record(dry)
wav_out(out)
```